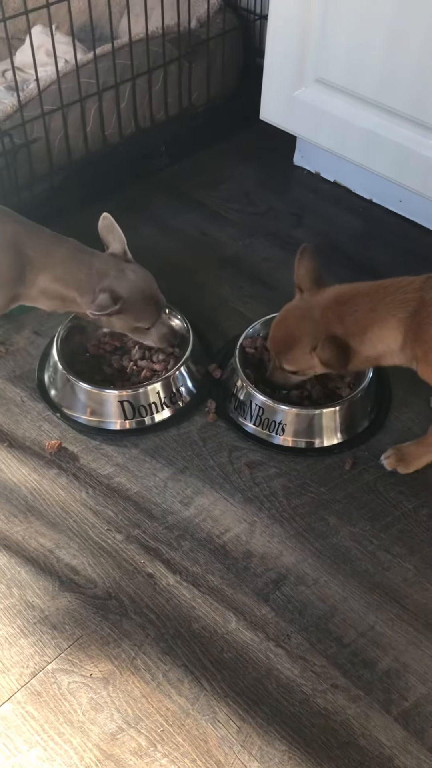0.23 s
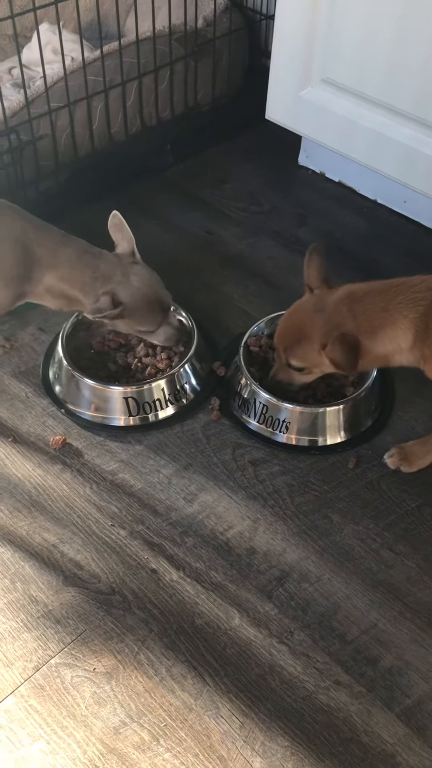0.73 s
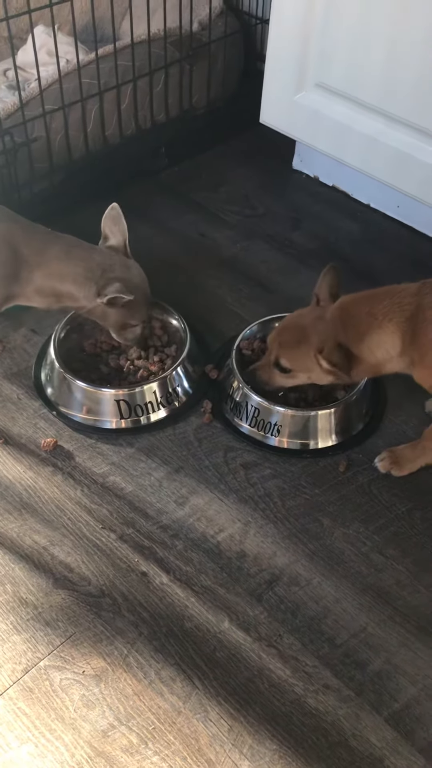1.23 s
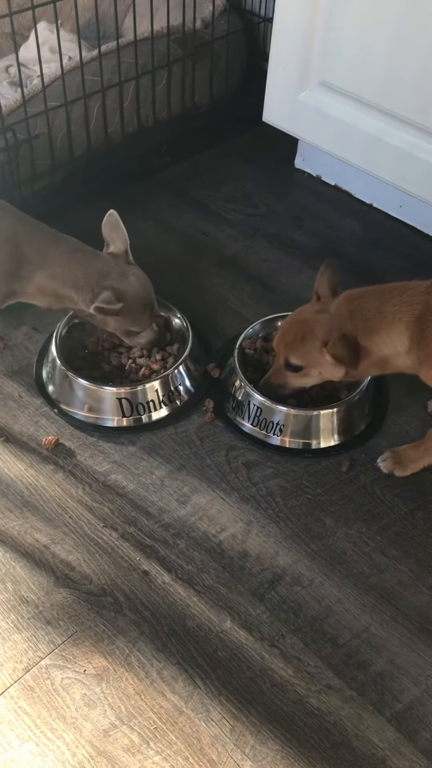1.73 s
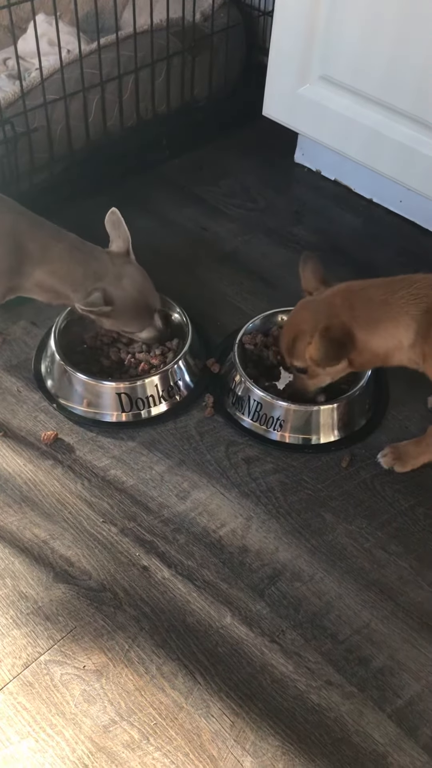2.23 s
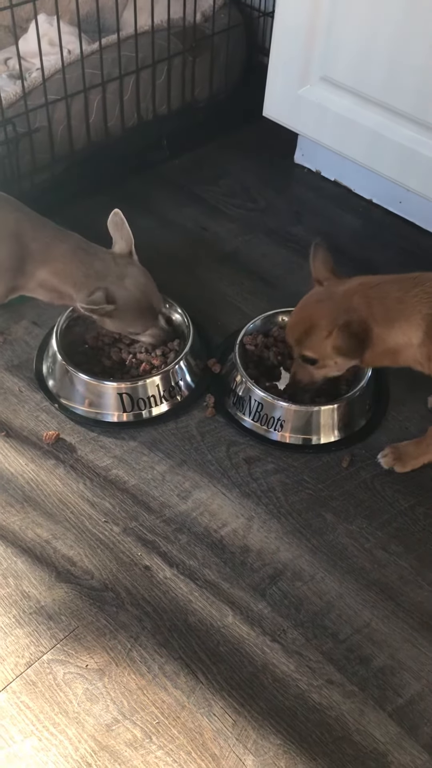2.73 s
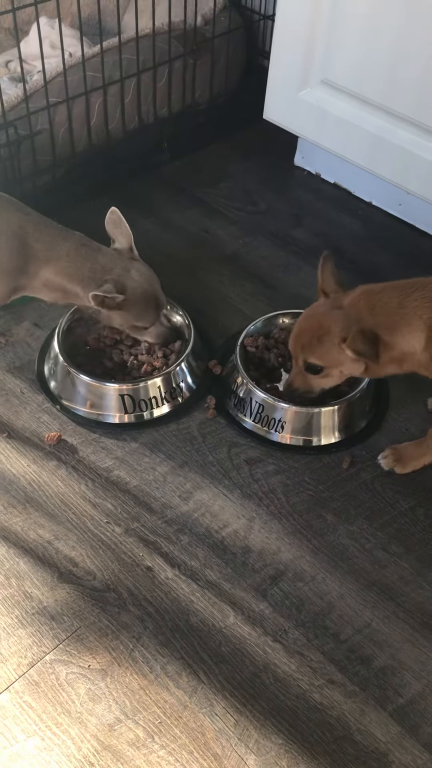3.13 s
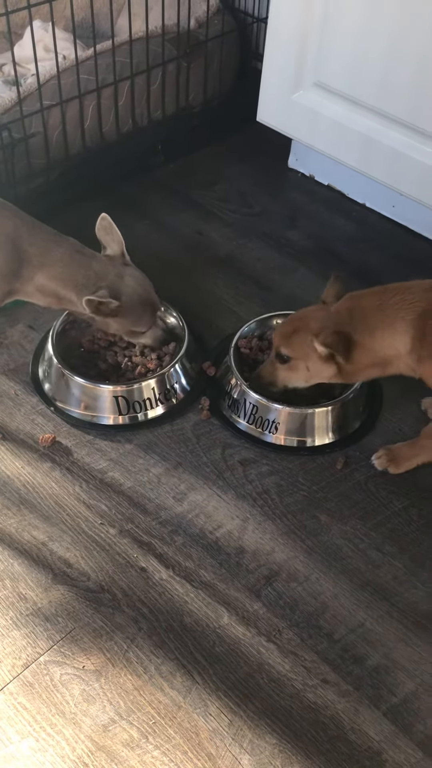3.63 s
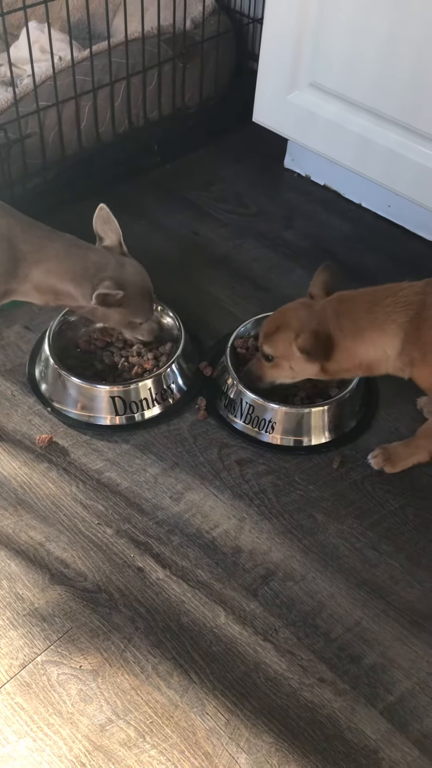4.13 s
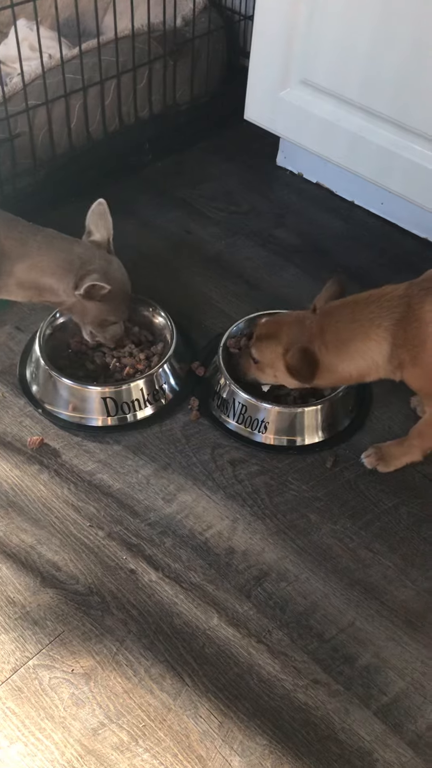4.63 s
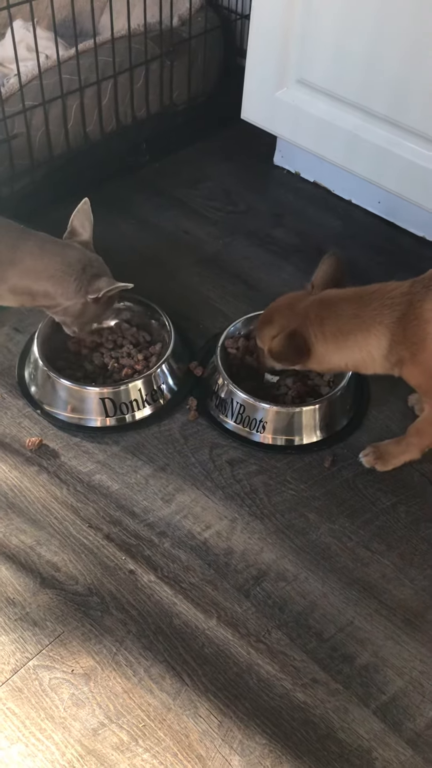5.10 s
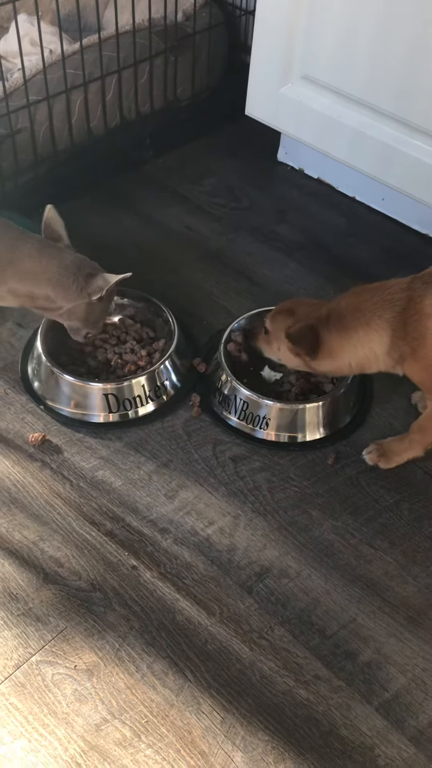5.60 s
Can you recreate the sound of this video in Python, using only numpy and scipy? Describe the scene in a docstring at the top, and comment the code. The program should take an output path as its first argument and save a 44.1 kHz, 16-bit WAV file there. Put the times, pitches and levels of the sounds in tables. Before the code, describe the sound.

Two small dogs crunch dry kibble from metal bowls close by, with a bang across the room and a harsh scrape at the end.

```python
"""Two small dogs at their bowls

Close by on a kitchen floor, two small dogs eat dry kibble from steel bowls: filtered noise bursts and short
damped rings make the cracks, ticks, squeaks and bumps, and dense random grains the rustle under the muzzles.
Something heavy bangs shut across the room, as decaying noise over ringing modes. An appliance hums in narrow
noise bands with a thin wavering whine. Loud dense grains make a close scrape that starts at the end."""
import sys
import numpy as np
from scipy import signal
from scipy.fft import rfft, irfft, next_fast_len
from scipy.io import wavfile

SR = 44100
rng = np.random.default_rng(int(sys.argv[2]) if len(sys.argv) > 2 else 0)


def to_wav(sig):
    """Store sig (one row per channel, or 1-D mono) as 16-bit WAV at the path in sys.argv[1].

    Samples outside -1..1 are clipped; the rate is SR.
    """
    pcm = np.clip(np.atleast_2d(sig), -1, 1) * 32767
    pcm = np.round(pcm).astype(np.int16)
    wavfile.write(sys.argv[1], SR, pcm.T)  # frames by channels


N = 258426
TIME = np.arange(N) / SR


def from_db(db):
    """Turn decibels into an amplitude factor."""
    return 10 ** (np.asarray(db) / 20)


def rms_one(x):
    """Scale to rms 1."""
    return x / np.sqrt(np.mean(x ** 2) + 1e-20)


def peak_one(x):
    """Scale to peak 1."""
    return x / (np.abs(x).max() + 1e-20)


def at_hz(points, hz):
    """Read a curve of (Hz, value) points, interpolated along log frequency."""
    points = np.array(points)
    return np.interp(np.log(hz), np.log(points[:, 0]), points[:, 1])


def dying(t, t60):
    """Exponential decay that loses 60 dB in t60 seconds."""
    return from_db(-60 * t / t60)


def add(out, s, sound):
    """Mix a sound in, starting at time s."""
    start = int(np.clip(round(s * SR), 0, N))
    out[start:start + len(sound)] += sound[:N - start]


def passed(x, edges_hz, kind, order=2):
    """Butterworth filter."""
    sos = signal.butter(order, edges_hz, kind, fs=SR, output="sos")
    return signal.sosfilt(sos, x)


def around(x, hz, spread):
    """Keep the band from hz / spread to hz * spread."""
    return passed(x, [hz / spread, hz * spread], "band")


def peaked(x, peaks):
    """Raise or hollow narrow bands, one after another."""
    for hz, width_hz, db in peaks:
        band = signal.lfilter(*signal.iirpeak(hz, hz / width_hz, fs=SR), x)
        x = x + (from_db(db) - 1) * band
    return x


def coloured(x, spectrum):
    """Give a white signal a spectrum through a causal (minimum-phase) filter; rms 1."""
    size = 2 * next_fast_len(N // 2 + SR // 4)
    hz = np.maximum(np.fft.rfftfreq(size, 1 / SR), 1)
    bass_fall = np.minimum(hz / spectrum[0][0], 1) ** 2   # below the first point
    gain = from_db(at_hz(spectrum, hz)) * bass_fall
    # the causal half of the cepstrum, doubled, gives the minimum phase
    cepstrum = irfft(np.log(gain))[:size // 2]
    response = np.exp(2 * rfft(cepstrum, size))
    return rms_one(irfft(rfft(x, size) * response)[:N])


def diffuse(t60s, ragged_db=0):
    """Dense reflections: white noise that dies band by band; its level also wavers if ragged."""
    t, edges = TIME[:SR * 2 // 3], np.geomspace(45, 17000, 22)
    white, out = rng.standard_normal((2, len(t))), 0
    for k, (low, high) in enumerate(zip(edges, edges[1:])):
        # neighbouring bands draw on different noise
        band = rms_one(passed(white[k % 2], [low, high], "band"))
        share = np.sqrt((high - low) / edges[-1])
        out = out + band * share * dying(t, at_hz(t60s, np.sqrt(low * high)))
    clumps = rms_one(passed(rng.standard_normal(len(t)), 140, "low"))
    return out * from_db(ragged_db * clumps)


def grains(per_s, spread_db):
    """Random tiny contacts of uneven size; rms 1."""
    unevenness = np.minimum(rng.exponential(1, N), 4)
    sizes = from_db(spread_db * unevenness) * rng.standard_normal(N)
    return rms_one(sizes * (rng.random(N) < per_s / SR))


def hum(air_db=-59.5):
    """Narrow noise bands waver as a running appliance over the coloured noise of the room's air."""
    # still air of the room: frequency_hz, relative_level_db (per Hz)
    air_colour = [(25, -52), (45, 9), (65, 2), (130, -3.5), (200, -1), (300, 1), (450, -5), (800, -7.5),
                  (1400, -15), (2400, -28), (5500, -36), (8000, -28.5), (16000, -31)]
    # appliance noise bands: centre_hz, level_db (rms), width_hz
    hum_bands = [(58.3, -71.5, 1.2), (82.6, -64, 6.3), (120.5, -67.5, 3.9), (165.2, -72.5, 3.6),
                 (248.9, -63.5, 7.9), (950, -75, 21), (1730, -77, 210), (3340, -93, 420),
                 (12400, -82.5, 1100)]
    out = from_db(air_db) * coloured(rng.standard_normal(N), air_colour)
    white = rng.standard_normal(N + SR)   # the first second lets the narrow filters settle
    for hz, db, width_hz in hum_bands:
        edges_hz = [hz - width_hz / 2, hz + width_hz / 2]
        out += from_db(db) * rms_one(passed(white, edges_hz, "band", order=1)[SR:])
    return out


def whine(tone_hz=5294, level_db=-77, waver_hz=4):
    """A thin electrical tone of steady level (rms) whose pitch barely wavers."""
    hz = tone_hz + waver_hz * rms_one(passed(rng.standard_normal(N), 26, "low"))
    phase = 2 * np.pi * np.cumsum(hz) / SR
    return from_db(level_db) * np.sqrt(2) * np.sin(phase)


def stroke(s, length, attack_s, t60):
    """Gain of one movement: it rises, holds to the end of its length and dies away."""
    rise = np.clip((TIME - s) / attack_s, 0, 1)
    return rise * dying(np.clip(TIME - s - length, 0, 2 * t60), t60)


def rustle(stir_db=-69.5, attack_s=0.011, settle_t60=0.32, patchy_db=2.0, shifts_per_s=22, pivot_hz=4000):
    """Pieces rub and slide under a muzzle; each pitch region swells on its own as the heap shifts."""
    # a muzzle pushes through the kibble: start_s, length_s, level_db, treble_tilt_db (per octave)
    pushes = [(.172, 0.035, -55, 0), (0.447, 0.04, -67.5, 3), (0.705, .04, -62, -4),
              (.83, 0.085, -62.5, -2.5), (1.185, 0.064, -59, 2), (1.35, 0.051, -62.5, 6),
              (1.505, 0.033, -61, -2.5), (2.423, 0.057, -60.5, 0), (2.578, 0.15, -57.5, 0.5),
              (2.749, .06, -59, 1.5), (2.932, 0.053, -56, 1), (3.033, 0.065, -62, 1.5),
              (3.33, 0.026, -62, 1.5), (3.412, 0.12, -63.5, 0), (4.257, 0.025, -64, 0),
              (4.353, 0.026, -67, -4.5),          (4.748, 0.14, -60.5, 0.5), (4.916, 0.051, -59, .5),
              (4.995, 0.028, -57, -0.5), (5.095, 0.037, -59.5, -1), (5.394, 0.028, -68.5, 7),
              (5.586, 0.051, -66.5, -3.5), (5.737, 0.019, -51, -0.5)]
    # colour of the sliding kibble: frequency_hz, relative_level_db (per Hz)
    rustle_colour = [(500, 4), (1200, 6), (2300, 0), (3500, 2), (4900, 3.5), (5700, 1.5), (7800, -5.5),
                     (9000, -4), (10500, -8.5), (11800, -9), (16000, -29)]
    edges, heap = np.geomspace(500, 16000, 13), 0
    power, tilt = from_db(stir_db) ** 2, 0   # faint untilted stirring between the pushes
    for s, length, db, tilt_db in pushes:
        push = (from_db(db) * stroke(s, length, attack_s, settle_t60)) ** 2
        power, tilt = power + push, tilt + push * tilt_db
    brightness_db = tilt / power   # the strongest movement sets the colour
    for low, high in zip(edges, edges[1:]):
        swell = np.interp(TIME * shifts_per_s, np.arange(SR), rng.standard_normal(SR))
        octaves = np.log2(np.sqrt(low * high) / pivot_hz)
        band = passed(grains(per_s=3500, spread_db=1.5), [low, high], "band")
        heap = heap + from_db(patchy_db * swell + brightness_db * octaves) * band
    return np.sqrt(power) * coloured(heap, rustle_colour)


def bumps(swell_s=0.022, spread=1.217):
    """Soft low bumps: dull narrow-band thumps that swell and fade."""
    # start_s, peak_db, pitch_hz
    nudges = [(0.031, -46.5, 59.8), (0.083, -51, 71), (.725, -45.5, 81), (0.741, -44.5, 154),
              (.86, -52, 118), (0.911, -50, 304), (.96, -51.5, 406), (4.253, -50, 62.6), (4.835, -52, 160),
              (4.86, -52.5, 437), (5.11, -46, 69), (5.514, -47, 64), (5.602, -53, 68.5)]
    out, t = np.zeros(N), TIME[:SR // 4]
    for s, db, hz in nudges:
        thump = around(rng.standard_normal(SR), hz, spread)[-len(t):]
        add(out, s, from_db(db) * peak_one(thump * t * np.exp(-t / swell_s)))
    return out


def crunches(splinter_lift_db=3, splinter_t60=0.016, low_hz=1400, spread=1.25, dust_db=-14, dust_hz=5000,
             bite_s=0.00017, crumb_db=-17, crumb_hz=1600, crumb_t60=.2):
    """A piece snaps: the mouth rings, splinters crackle, crumbs follow. Returns direct and room-bound sound."""
    # kibble cracking in a mouth: start_s, mouth_peak_db, mouth_hz, splinter_db (relative to the mouth,
    # before the lift), splinter_hz (band top before the spread), room_db (relative send, before the room's level)
    cracks = [(0.085, -38, 773, -17, 2120, -2), (0.247, -24.5, 798, -13, 2070, -3.5),
              (0.261, -32.5, 1260, -25, 2160, -16), (0.314, -37, 1320, -10, 2860, -3.5),
              (0.528, -45, 900, -31, 1970, -2), (0.717, -48, 1200, -0.5, 3600, -2.5),
              (0.994, -43.5, 940, -16, 2120, -5), (1.154, -44.5, 1426, -2, 4280, -3.5),
              (1.281, -46, 1750, -3, 2000, -4), (1.336, -28, 904, -16, 3300, -5),
              (2.06, -36.5, 920, -21, 2000, -5.5), (2.31, -48.5, 950, -5, 1870, -1),
              (2.443, -32, 910, -9.5, 2100, -1.5), (2.843, -45, 935, -8.5, 3160, -2.5),
              (2.975, -36.5, 936, -12, 3350, -4), (3.057, -47.5, 920, -5, 2120, -4),
              (3.169, -44.5, 942, -11, 1990, 4), (3.343, -45.5, 1300, -4, 3390, -0.5),
              (3.429, -29.5, 925, -4.5, 1950, -3.5), (3.549, -43, 960, -8, 2130, -4),
              (3.678, -44, 977, -11, 2600, -7), (3.867, -39, 958, -4.5, 2470, -4.5),
              (4.579, -44, 946, -10, 3400, -6), (4.841, -46.5, 650, -1, 3320, -21),
              (4.891, -48, 870, -6, 3150, 1.5), (5.095, -45.5, 766, -1.5, 1970, -2),
              (5.331, -45, 660, -13, 3420, -11), (5.451, -46, 915, -2, 2070, -5),
              (5.487, -46.5, 960, -16, 2330, -9), (5.775, -34.5, 897, -1.5, 3150, -6.5)]
    # the mouth around a crack: ratio (to mouth_hz), relative_level_db, t60_s
    mouth = [(.55, -6, 0.016), (.78, -1, 0.013), (1.0, -1.5, 0.036), (1.42, -1, 0.018), (2.0, -13.5, 0.019)]
    out, sent, t = np.zeros(N), np.zeros(N), TIME[:SR // 8]
    for s, db, hz, bright_db, splinter_hz, room_db in cracks:
        own_db = rng.normal(0, 1, len(mouth))   # no two bites ring quite alike
        cavity = 0
        for k, (ratio, mode_db, t60) in enumerate(mouth):
            mode = np.sin(2 * np.pi * hz * ratio * t) * dying(t, t60)
            cavity = cavity + (-1) ** k * from_db(own_db[k] + mode_db) * mode
        cavity = peak_one(cavity * (1 - np.exp(-t / bite_s)))
        splinters, dust = rng.standard_normal((2, len(t))) * dying(t, splinter_t60)
        crack = passed(splinters, [low_hz, splinter_hz * spread], "band")
        crack = peak_one(crack + from_db(dust_db) * around(dust, dust_hz, 1.41))
        snap = from_db(db) * (cavity + from_db(bright_db + splinter_lift_db) * crack)
        # the closing jaw grinds the fragments in sparse, fading after-cracks
        sparse = rng.random(len(t)) < 900 / SR
        crumbs = around(rng.standard_normal(len(t)) * sparse * dying(t, crumb_t60), crumb_hz, 1.14)
        add(out, s, snap + from_db(db + crumb_db) * peak_one(crumbs))
        add(sent, s, from_db(room_db) * snap)
    return out, sent


def tick(hz, edge_db, t60=0.011, spread=1.23, rise_s=0.00061, skirt_db=-13, edge_hz=11000):
    """A tiny hard contact: a damped ring on a broader knock, with a sharp edge around edge_hz; peak 1."""
    t = TIME[:SR // 40]
    ring, knock, edge = rng.standard_normal((3, len(t))) * dying(t, t60) * (1 - np.exp(-t / rise_s))
    ring = peak_one(around(ring, hz, spread))
    knock = from_db(skirt_db) * peak_one(around(knock, hz, 1.46))
    edge = from_db(edge_db) * peak_one(around(edge, edge_hz, 1.48))
    return peak_one(ring + knock + edge)


def ticks(edge_offset_db=-4, faint_db=-58, faint_range_db=5, faint_low_hz=1500, faint_high_hz=11000, count=70):
    """Teeth and loose pieces tick clearly, with faint ticks of chewing strewn at random among them."""
    # clear ticks: start_s, peak_db, ring_hz, edge_db (relative to the ring, before the offset)
    clear_ticks = [(.165, -51, 10500, -12), (0.283, -49, 4870, -24), (.328, -40.5, 3700, -9),
                   (.343, -50, 10000, -12), (.669, -48.5, 6660, 1), (0.8372, -43.5, 11000, -10),
                   (.864, -38.5, 3530, -28), (.989, -49, 8000, -22), (1.016, -50.5, 6240, -20),
                   (1.124, -42.5, 11600, -13), (1.167, -38, 4570, -26), (1.3353, -37, 3700, -30),
                   (1.521, -46.5, 3230, -22), (1.894, -46, 4500, -22), (2.016, -48.5, 3040, -19),
                   (2.03, -38, 3480, -9.5), (2.3196, -44, 3600, -39), (2.43, -46, 8950, -17),
                   (2.435, -34, 5470, -18), (2.451, -45, 7050, -20), (2.487, -49, 2880, -18),
                   (2.61, -44, 4200, -19.5), (2.69, -42, 5470, -8), (3.059, -47.5, 6350, -20),
                   (3.086, -43, 11500, -14), (3.162, -51, 7100, -29), (3.3456, -44, 4600, 7),
                   (3.4276, -34.5, 3900, -21), (3.508, -45.5, 4600, -21), (3.536, -46, 6850, -18),
                   (3.66, -44.5, 12200, -18), (3.753, -47.5, 4600, -11), (4.1967, -52, 5760, -15),
                   (4.264, -36.5, 13000, 13), (4.483, -51, 5650, 0), (4.637, -41, 9000, 0),
                   (4.9273, -30, 5200, 3.5), (5.304, -48.5, 12900, -7), (5.5845, -49, 8200, -9),
                   (5.629, -41.5, 5900, -11), (5.67, -44.5, 7000, -1)]
    out = np.zeros(N)
    for s, db, hz, edge_db in clear_ticks:
        add(out, s, from_db(db) * tick(hz, edge_db + edge_offset_db))
    for when, size, pitch in rng.random((count, 3)):
        hz = faint_low_hz * (faint_high_hz / faint_low_hz) ** pitch
        add(out, when * N / SR, from_db(faint_db + faint_range_db * size) * tick(hz, edge_db=-32))
    return out


def squeaks(spread=1.075):
    """A brief slide of teeth or kibble on steel excites one narrow resonance."""
    # start_s, peak_db, pitch_hz, length_s
    slides = [(1.278, -50, 1760, 0.017), (2.175, -61, 3700, .018), (2.561, -52, 3230, 0.049),
              (2.595, -51.5, 4200, 0.048), (2.682, -52.5, 1870, 0.037), (3.05, -52, 1850, 0.032),
              (3.223, -54, 1700, 0.037), (4.705, -51, 6800, 0.022), (4.728, -54, 3430, 0.1),
              (4.795, -57, 3380, 0.12), (4.985, -57, 3500, 0.059), (5.697, -54, 3260, 0.028)]
    out = np.zeros(N)
    for s, db, hz, length in slides:
        slide = around(rng.standard_normal(SR // 4), hz, spread)[-int(length * SR):]
        add(out, s, from_db(db) * peak_one(slide * signal.windows.tukey(len(slide), .5)))
    return out


def bang(panel_db=-30, clatter_db=-46.0, swell_s=0.0011, ragged_db=0.5):
    """A blow across the room, heard mostly by its dense reflections, over the ringing modes of the panel."""
    # quick contacts of one bang, the later ones reaching into the bass:
    # start_s, relative_level_db, lowest_hz (that it moves)
    contacts = [(1.7394, -20.5, 393), (1.749, -26.5, 302), (1.758, -23.5, 50), (1.781, -32, 60)]
    # dense clatter: frequency_hz, relative_level_db (per Hz)
    clatter_colour = [(50, -44), (75, 1), (130, -6.5), (220, 5.5), (370, 3.5), (480, -4), (680, 0.5),
                      (800, -6), (1100, -1.5), (1800, -11.5), (2200, -17.5), (2700, -15), (3200, -27),
                      (4900, -32.5), (8500, -41.5), (16000, -45.5)]
    # its decay: frequency_hz, t60_s
    clatter_t60s = [(70, 0.42), (300, 0.25), (1000, 0.4), (3000, 0.42), (7000, 0.49), (14000, 0.37)]
    # metal fittings that jangle with it: centre_hz, width_hz, gain_db
    jangle = [(2660, 230, 0.5), (4000, 650, 7), (5350, 300, 8.5), (6800, 230, 7), (7770, 160, 9.5),
              (8140, 250, 5.5), (9470, 240, 12), (11300, 270, 8), (12500, 300, 4), (14000, 250, -1)]
    # ringing modes of the banged panel: pitch_hz, relative_level_db, t60_s
    panel = [(71.8, -7.5, 0.6), (244.7, -2.5, 0.33), (366, -14, 0.42), (401, -9.5, 0.53), (590.5, -1, 0.39),
             (635, -14, 0.6), (666, -4, 0.51), (725, -27, 0.27), (947, -6.5, 0.59), (1088, -3, 0.3),
             (1290, -18, 0.3), (1335, -8, 0.55), (1410, -24, 0.24), (1486, -4.5, 0.29), (1774, 3.5, 0.086),
             (2210, -18, 0.47), (2370, -30, 0.36), (2450, -29, 0.49), (2520, -14, 0.42), (2720, -7, 0.16),
             (3100, -26, 0.36), (3360, -19, 0.38), (3680, -21, 0.34), (4520, -26, 0.19), (5390, -23, 0.44),
             (6700, -26, 0.45)]
    blows, t = np.zeros(N), TIME[:SR]
    for s, db, low_hz in contacts:
        add(blows, s, from_db(db) * passed(diffuse(clatter_t60s, ragged_db), low_hz, "high"))
    out = from_db(clatter_db) * peaked(coloured(blows, clatter_colour), jangle)
    modes = 0
    for hz, db, t60 in panel:
        modes = modes + from_db(db) * np.sin(2 * np.pi * (hz * t + rng.random())) * dying(t, t60)
    second_contact_s = contacts[1][0]
    add(out, second_contact_s, from_db(panel_db) * modes * (1 - np.exp(-t / swell_s)))
    return out


def scrape(start_s=5.828, attack_s=0.013, level_db=-32.3):
    """Something drags close to the microphone: dense grains that set in quickly and hold."""
    # colour of the scrape: frequency_hz, relative_level_db (per Hz)
    scrape_colour = [(88, -14), (150, -15), (341, -3.5), (662, -6), (998, -3), (2060, -7.5), (2360, -9.5),
                     (4410, -1.5), (5050, -9.5), (9630, -8.5), (16000, -19)]
    pressure = np.clip((TIME - start_s) / attack_s, 0, 1)
    return from_db(level_db) * pressure * coloured(grains(per_s=20000, spread_db=-1.5), scrape_colour)


def kitchen(x, first_echo_s=.004):
    """The reverberation of a hard-floored room, through a decaying noise tail of unit energy."""
    # decay of the room: frequency_hz, t60_s
    room_t60s = [(100, 0.24), (400, 0.28), (1000, 0.32), (3000, 0.36), (8000, 0.31), (16000, 0.27)]
    tail, out = diffuse(room_t60s), np.zeros(N)
    add(out, first_echo_s, signal.fftconvolve(x, tail / np.linalg.norm(tail))[:N])
    return out


def scene(crunch_room_db=0.5, tick_room_db=-9, wall_cut_hz=8000):
    """The dogs are near; the room answers their cracks, ticks and squeaks, a little duller."""
    chewing, sent = crunches()
    ticking = ticks() + squeaks()
    into_room = from_db(crunch_room_db) * sent + from_db(tick_room_db) * ticking
    room = kitchen(passed(into_room, wall_cut_hz, "low", order=1))
    background = hum() + whine()
    mix = background + rustle() + bumps() + chewing + ticking + room + bang() + scrape()
    return mix[None]   # one channel


def record(dry, bass_cut_hz=38, treble_cut_hz=16000):
    """The microphone hollows a few treble bands; the deepest bass and the top are cut."""
    # hollows in the microphone's response: centre_hz, width_hz, gain_db
    mic_dips = [(4860, 900, -4), (7750, 290, -4.5), (10420, 470, -7)]
    heard = passed(peaked(dry, mic_dips), bass_cut_hz, "high")
    steep_cut = signal.ellip(12, .1, 70, treble_cut_hz, fs=SR, output="sos")
    return signal.sosfilt(steep_cut, heard)


dry = scene()
out = record(dry)
to_wav(out)
```